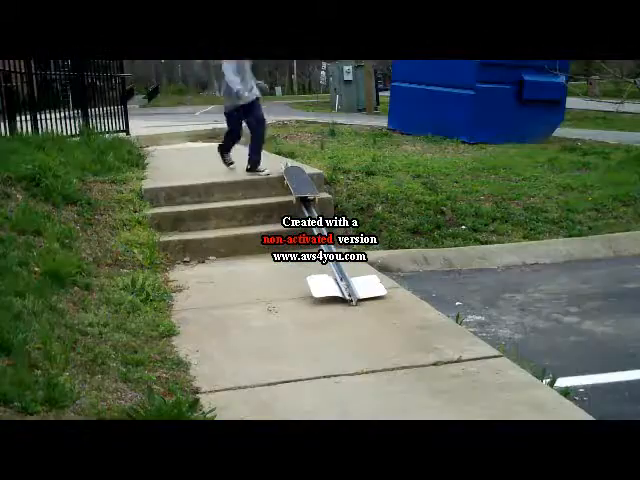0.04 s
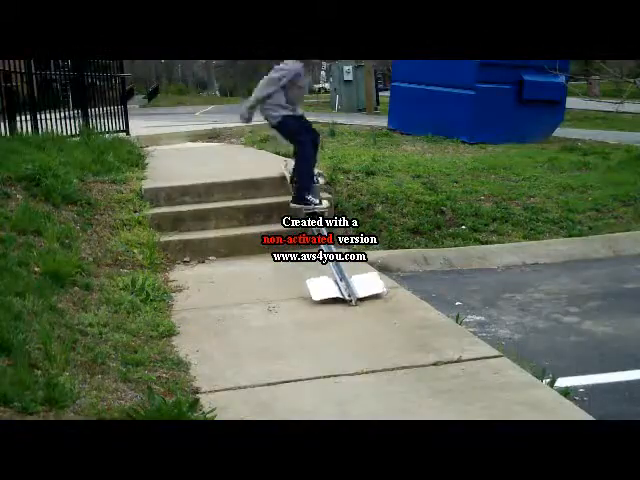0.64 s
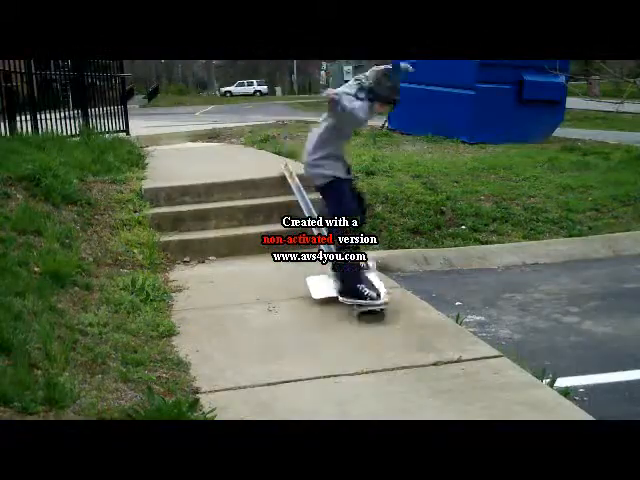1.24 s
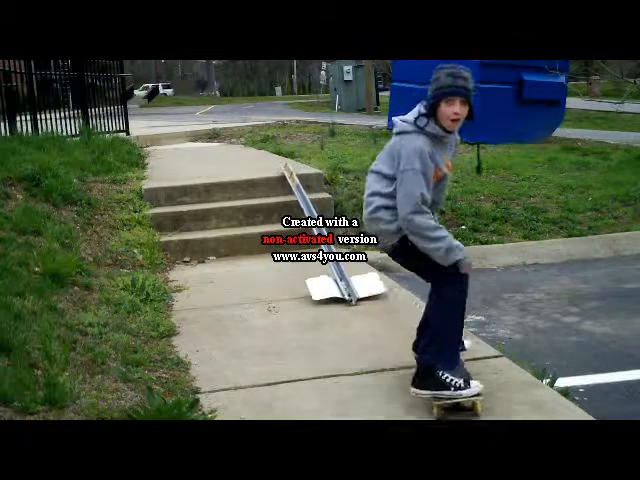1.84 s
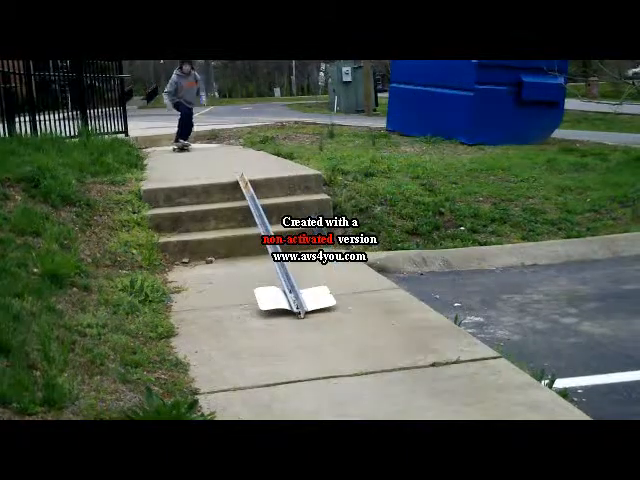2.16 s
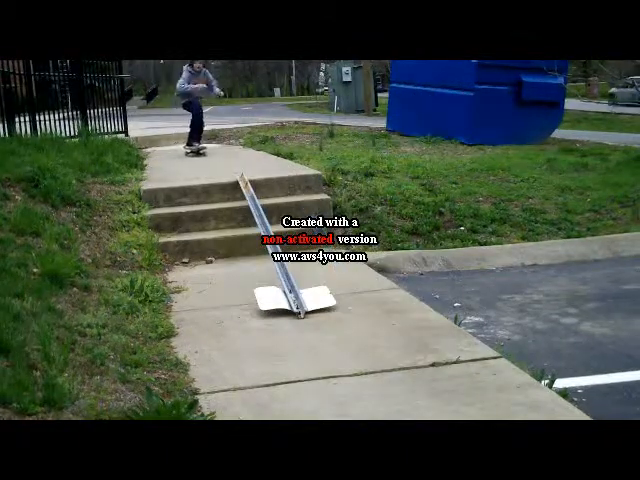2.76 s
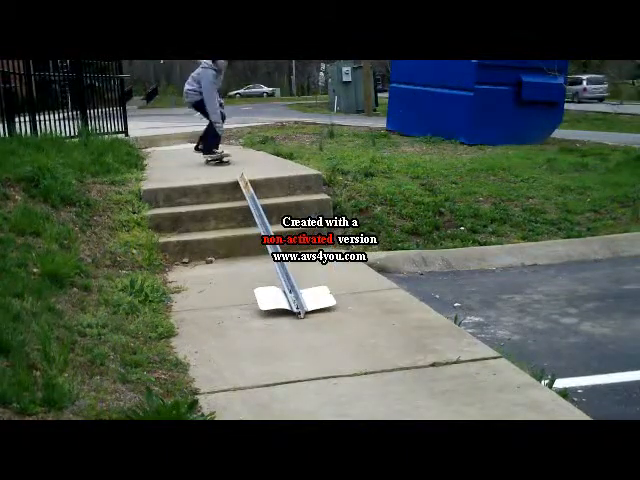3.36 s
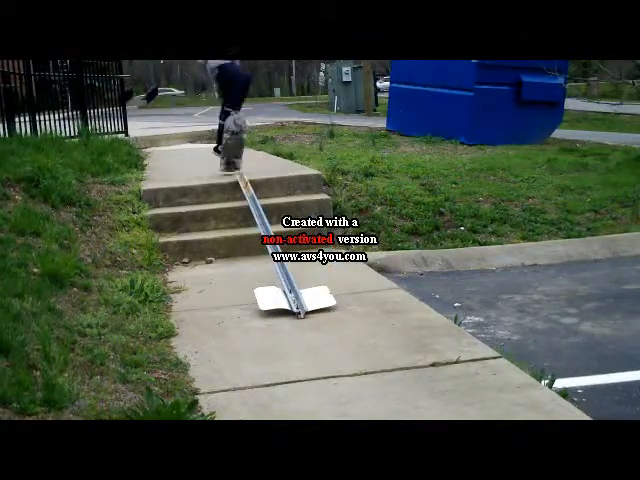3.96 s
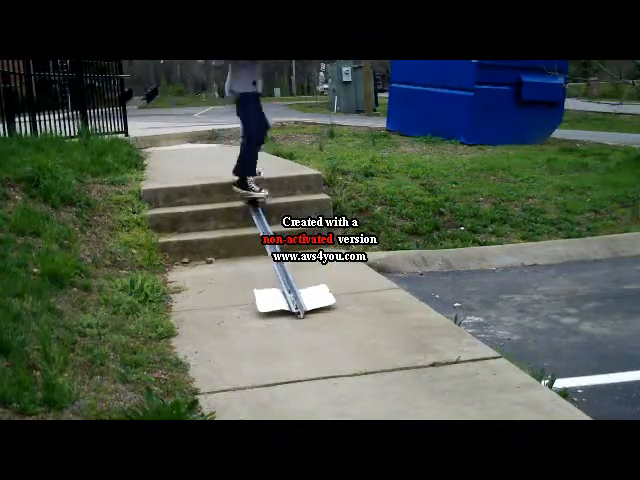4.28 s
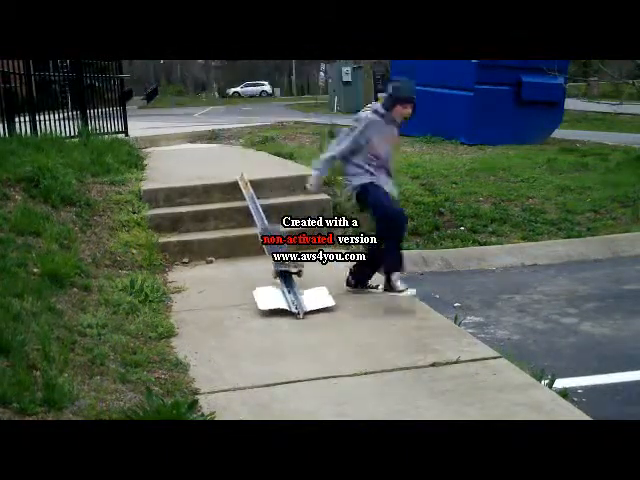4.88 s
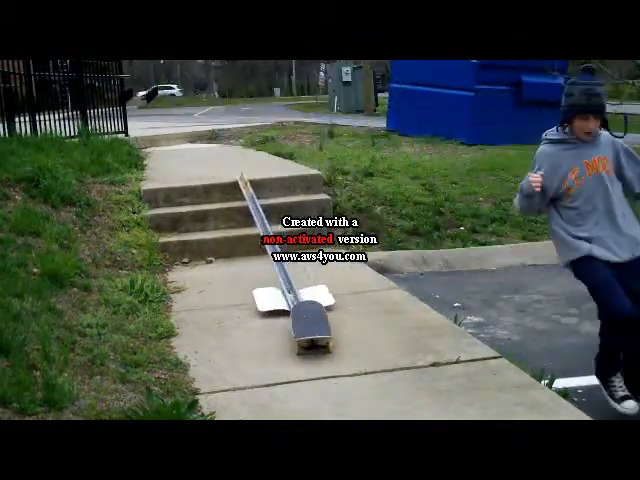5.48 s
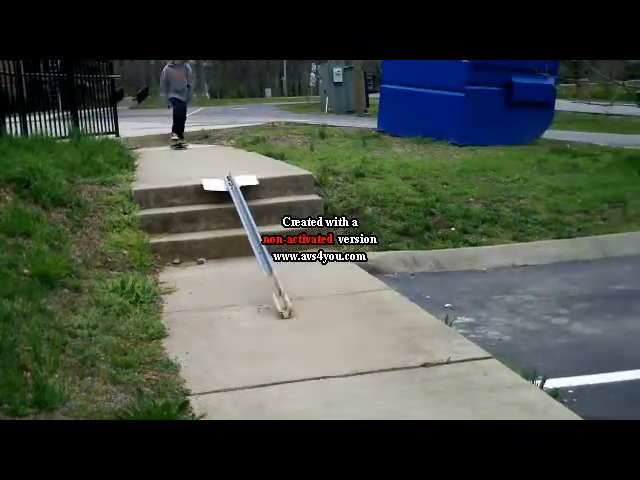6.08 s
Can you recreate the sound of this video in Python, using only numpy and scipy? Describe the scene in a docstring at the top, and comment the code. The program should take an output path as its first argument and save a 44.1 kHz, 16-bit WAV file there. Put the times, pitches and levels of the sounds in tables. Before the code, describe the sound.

Skateboard scraping along a ringing steel rail and rolling on concrete, followed by a second try with a sharp pop and rattling slide.

```python
"""A skateboard grinds down a steel rail, metal catching on metal and ringing the tube, then lands on
concrete and rolls on hard wheels. After an abrupt cut it rolls in from afar, knocking over pavement
joints, pops, slams onto the rail and clatters down it without its rider, wheels whirring and trucks
rattling, then rolls away. Light wind and distant traffic lie underneath."""
import sys
import numpy as np
from scipy import signal
from scipy.fft import rfft, irfft, next_fast_len
from scipy.io import wavfile

SR = 44100
rng = np.random.default_rng(int(sys.argv[2]) if len(sys.argv) > 2 else 0)


def inscribe(sig):
    """Save sig as 16-bit PCM at rate SR to the path in sys.argv[1].

    A 1-D sig is mono; a 2-D sig holds one channel per row.
    Samples are clipped to [-1, 1] before scaling.
    """
    pcm = np.round(np.clip(np.atleast_2d(sig).T, -1, 1) * 32767)
    wavfile.write(sys.argv[1], SR, pcm.astype(np.int16))


N = 269892
T = np.arange(N) / SR
CUT_S = 2.015   # the second ride takes over
SKID_START_S, SKID_END_S = 4.375, 5.5   # the riderless board is on the rail

# the truck bites into the rail as the rider's weight shifts: (time [s], scrape [dB], rasp pitch [Hz])
RIDER_PRESSURE = [(0.6, -30, 950), (0.623, -25, 950), (0.72, -24, 850), (0.781, -19, 950),
                  (0.83, -22, 1200), (0.892, -14, 1342), (1.0, -17.5, 1147), (1.14, -16.5, 1709),
                  (1.261, -17.5, 1558), (1.31, -21.5, 1500), (1.345, -16.5, 1650), (1.439, -15.5, 1750)]
# resonances of deck and trucks: (pitch [Hz], width [Hz], level [dB])
DECK_MODES = [(366, 42, 3), (780, 66, 3.5), (1130, 210, 6.5), (1580, 84, -3), (1920, 170, -13),
              (3010, 200, -2.5), (5030, 500, 1), (6550, 120, -4), (8870, 200, -10)]


def from_db(db):
    """Decibels to amplitude."""
    return 10 ** (np.asarray(db) / 20)


def rms_one(x):
    """Scales a sound to rms 1."""
    return x / np.sqrt(np.mean(x ** 2) + 1e-20)


def in_time(rows):
    """Turns rows of (time, values...) into one automation curve per value."""
    times, *columns = np.transpose(rows)
    return [np.interp(T, times, column) for column in columns]


def during(start, end, fade_in=0.013):
    """A gate, open from start to end, with short fades."""
    return np.clip((T - start) / fade_in + .5, 0, 1) * np.clip((end - T) / .006 + .5, 0, 1)


def swell(crest, half_length):
    """A bell-shaped rise and fall."""
    return np.exp(-np.minimum(((T - crest) / half_length) ** 2, 40))


def dying(t, t60):
    """An envelope that jumps to 1 at t = 0 and decays."""
    return (t >= 0) * from_db(-60 * np.clip(t / t60, 0, 3))


def butter(x, hz, kind, order=2):
    """A Butterworth filter."""
    return signal.sosfilt(signal.butter(order, hz, kind, fs=SR, output="sos"), x)


def resonance(x, hz, width_hz):
    """One ringing band-pass mode."""
    r = np.exp(-np.pi * width_hz / SR)
    feedback = [1, -2 * r * np.cos(2 * np.pi * hz / SR), r * r]
    return signal.lfilter(np.array([1, 0, -1]) * (1 - r * r) / 2, feedback, x + 1e-18)


def eq_curve(spectrum, size):
    """Gain per FFT bin through (Hz, dB) points."""
    hz, db = np.transpose(spectrum)
    return from_db(np.interp(np.log(np.fft.rfftfreq(size, 1 / SR) + 1), np.log(hz), db))


def coloured(x, spectrum):
    """Gives a steady sound a tone colour; rms 1."""
    size = next_fast_len(N)
    return rms_one(irfft(rfft(x, size) * eq_curve(spectrum, size), size)[:N])


def drift(rate_hz):
    """A smooth random wobble, mostly slower than rate_hz; rms about 1."""
    hop, run_in = 40, 2000
    r = np.exp(-2 * np.pi * rate_hz * hop / SR)
    noise = rng.standard_normal(N // hop + run_in + 2)
    slow = signal.lfilter([1], [1, -2 * r, r * r], noise)[run_in:]
    return np.interp(np.arange(N) / hop, np.arange(len(slow)), rms_one(slow))


def narrow_noise(hz, width_hz):
    """A band of noise around a moving pitch; rms about 1."""
    phase = 2 * np.pi * np.cumsum(hz) / SR
    return drift(width_hz) * np.cos(phase) + drift(width_hz) * np.sin(phase)


def grains(per_s, spread_db):
    """Tiny collisions of uneven size at random moments; rms 1."""
    sizes = from_db(spread_db * np.minimum(rng.exponential(1, N), 4)) * rng.choice([-1, 1], N)
    return rms_one(sizes * (rng.random(N) < per_s / SR))


def wind(gust_db=2.0):
    """Gusts buffet the microphone with a deep rumble."""
    # colour of the buffeting: (frequency [Hz], gain [dB])
    colour = [(10, -2), (18, 3.5), (30, -4.5), (42, -20.5), (100, -17.5)]
    # strength of the wind: (time [s], level [dB])
    strength = [(0, -37), (0.9, -31.5), (1.05, -30.5), (1.75, -29.5), (2.15, -41.5), (3.05, -37),
                (3.6, -39), (6.12, -44)]
    rumble = rms_one(butter(coloured(rng.standard_normal(N), colour), 85, "low"))
    return from_db(in_time(strength)[0] + gust_db * drift(1.5)) * rumble


def traffic(start_db=-45, growth_db_per_s=0.65, waver_db=0.9):
    """Distant engines drone, waver and slowly grow."""
    # colour of the engines: (frequency [Hz], gain [dB])
    colour = [(29, -37), (50, -4), (54, 7), (92, -1.5), (118, 0.5), (140, -5.5), (193, -15), (260, 6),
              (340, -47), (570, -120)]
    drone = rms_one(butter(coloured(rng.standard_normal(N), colour), [65, 160], "band"))
    return from_db(start_db + growth_db_per_s * T + waver_db * drift(4.4)) * drone


def open_air(air_db=-44):
    """A steady bed of outdoor noise with thin whines in its hiss."""
    # colour of the air: (frequency [Hz], gain [dB])
    colour = [(35, -43), (60, 6.5), (108, -1.5), (149, -12), (189, -12), (330, -20), (882, -18),
              (968, -16.5), (4970, -40.5), (6000, -37), (7060, -47), (7570, -39), (9790, -44), (14900, -48),
              (16000, -66)]
    # faint high whines: (pitch [Hz], width [Hz], level [dB])
    whines = [(6020, 91, -66), (8050, 300, -73), (8940, 180, -65.5), (15050, 80, -85)]
    air = from_db(air_db) * rms_one(butter(coloured(rng.standard_normal(N), colour), 160, "high"))
    hiss = rng.standard_normal(N)
    return air + sum(from_db(db) * rms_one(resonance(hiss, hz, width)) for hz, width, db in whines)


def sliding_power(ridden_hiss_db=-4.5, skid_db=-25.5, scrape_fade_db_per_s=0.5, hiss_fade_db_per_s=13.5):
    """Power of scrape and hiss: pressed by the rider, then dulling as the loose board loses speed."""
    pressure = from_db(in_time(RIDER_PRESSURE)[0])
    ridden = during(RIDER_PRESSURE[0][0], RIDER_PRESSURE[-1][0]) * pressure
    loose = during(SKID_START_S, SKID_END_S)
    age = np.maximum(T - SKID_START_S, 0)
    scrape = ridden + loose * from_db(skid_db - scrape_fade_db_per_s * age)
    hiss = ridden * from_db(ridden_hiss_db) + loose * from_db(skid_db - hiss_fade_db_per_s * age)
    return scrape ** 2, hiss ** 2


def grind(clank_db=2.5, judder_db=-1.0, patchy_db=1.5, split_hz=3200, zing_db=-11.5):
    """Metal catches on metal thousands of times a second; each bang presses harder for a moment."""
    # colour of the friction: (frequency [Hz], gain [dB])
    colour = [(88, -66), (150, -19), (303, -12), (354, -11), (391, -9), (624, -5), (759, -3), (1600, 1),
              (3490, -9.5), (5570, -8), (7770, -15.5), (9820, -15.5), (12200, -20), (15100, -32),
              (16000, -64)]
    # the board bangs on the rail: (time [s], relative level [dB], half of t60 [s], relative treble [dB])
    clanks = [(0.582, -32, 0.06, -1), (0.613, -16, 0.044, 8), (0.618, -16.5, 0.035, 5),
              (0.768, -19.5, 0.09, 2), (1.047, -17, 0.2, 0), (1.405, -17, 0.014, -6),
              (1.437, -28, 0.088, 9.5), (4.374, -17.5, 0.091, 5), (4.387, -13.5, 0.089, 8.5),
              (4.406, -18, 0.09, 14.5), (4.44, -16.5, 0.068, 11.5), (4.486, -21.5, 0.21, -18),
              (4.522, -21, 0.12, -9), (4.576, -19.5, 0.23, 0), (4.763, -16, 0.15, -2.5),
              (4.871, -21.5, 0.087, 4), (4.9576, -15, 0.18, 7.5), (5.085, -24, 0.018, 11),
              (5.13, -21.5, 0.29, 1), (5.174, -19, .07, -8), (5.222, -25, 0.17, 0), (5.283, -17, 0.15, -8),
              (5.353, -18.5, 0.12, 0), (5.422, -20, 0.093, -4), (5.484, -19.5, 0.2, -1)]
    friction = np.zeros(N)
    edges_hz = np.geomspace(100, 16000, 15)
    contacts = [grains(per_s=6000, spread_db=2.0) for _ in range(2)]
    for k in range(len(edges_hz) - 1):   # the wandering contact point favours now one band, now another
        friction += butter(contacts[k % 2], edges_hz[k:k + 2], "band") * from_db(patchy_db * drift(9.6))
    friction = coloured(friction, colour) * from_db(judder_db * drift(92))
    scrape = rms_one(butter(friction, split_hz, "low", order=4))
    hiss = rms_one(butter(friction, split_hz, "high", order=4))
    zing = rms_one(butter(hiss, 9000, "high", order=1))   # the bright edge of a bang
    scrape_power, hiss_power = sliding_power()
    zing_power = np.zeros(N)
    for s, db, half_t60, treble_db in clanks:
        start = int(s * SR)
        t = T[:N - start]
        bite = 1 - np.exp(-t / (0.02 * half_t60))   # a long scrape takes a moment to bite
        power = (from_db(db + clank_db) * bite * dying(t, 2 * half_t60)) ** 2
        scrape_power[start:] += power
        zing_power[start:] += power * from_db(treble_db + zing_db) ** 2
    force = scrape * np.sqrt(scrape_power) + hiss * np.sqrt(hiss_power) + zing * np.sqrt(zing_power)
    return rail(force) + rattle(scrape_power)


def rail(force, body_db=-1.5, ring_db=1.5, wash_db=-16.0, wash_t60=0.91):
    """The steel tube answers at once, rings in its strong modes and leaves a wash of many weak ones."""
    # ringing of the rail: (pitch [Hz], relative level [dB], t60 [s])
    modes = [(360, -2, .3), (495, -3, .3), (570, -3, .3), (636, 1, .4), (710, -3, .25), (915, -5, .15),
             (1001, -3, .4), (1282, -5, .25), (1451, -6, .25), (1631, -3, .25), (1797, -6, .25),
             (2256, -7, .25), (2860, -6, .2), (3213, -6, .4), (3648, -7, .2), (3842, -2, .2),
             (4317, -5, .15), (4413, -4, .3), (4570, -6, .2), (4705, -5, .2), (5135, -5, .1),
             (5245, -6, .12), (5617, -5, .15), (5672, -4, .15), (6056, -4, .25), (6697, -4, .25),
             (6975, -5, .2), (7365, 0, .25)]
    ring = sum(from_db(db) * resonance(force, hz, np.log(1000) / (np.pi * t60)) for hz, db, t60 in modes)
    t = T[:SR // 2]
    weak_modes = butter(rng.standard_normal(len(t)), [400, 6000], "band") * dying(t, wash_t60)
    wash = signal.fftconvolve(force, weak_modes / np.linalg.norm(weak_modes))[:N]
    return from_db(body_db) * (force + from_db(ring_db) * ring) + from_db(wash_db) * wash


def rasp(rasp_db=-3.5, width_hz=184.0, groan_wobble_hz=48):
    """Stick and slip favour one rough pitch, louder under more weight, and pump the rail's low modes."""
    # a low mode swells for a moment: (crest [s], pitch [Hz], level [dB], half length [s])
    groans = [(0.99, 672, -24.5, 0.025), (1.044, 560, -27, .025), (1.185, 621, -19, 0.022),
              (1.334, 677, -22.5, 0.046), (1.484, 622.6, -29.5, 0.066)]
    scrape_db, rasp_hz = in_time(RIDER_PRESSURE)
    on_rail = during(RIDER_PRESSURE[0][0], RIDER_PRESSURE[-1][0])
    out = on_rail * from_db(scrape_db + rasp_db) * narrow_noise(rasp_hz, width_hz)
    for crest, hz, db, half_length in groans:
        phase = 2 * np.pi * np.cumsum(hz + groan_wobble_hz * drift(65.6)) / SR
        out += from_db(db) * swell(crest, half_length) * np.sqrt(2) * np.sin(phase)
    return out


def knocks(width_share=0.38, thump_hz=280, tail_db=-37.0, tail_t60=0.29, sharp_s=0.0095, deck_db=-6.0):
    """A blow and its chatter sound a broad wooden resonance, with a crack above and a thump below."""
    # the board knocks on concrete, joints and rail, with a shoe scuff after the pop:
    # (time [s], level [dB], pitch [Hz], chatter t60 [s], relative crack [dB], relative thump [dB])
    blows = [(1.4362, -2, 1280, 0.02, -10, -15.5), (1.4405, -6, 616, 0.0084, -27, -12),
             (1.5858, -21, 2280, 0.012, 1.5, -1), (1.713, -8.5, 1850, 0.0047, -0.5, -24),
             (1.717, -14, 1680, 0.065, -15, -9), (1.813, -18, 1870, 0.014, -22, -9),
             (1.882, -9.5, 1400, 0.046, -14, -12), (2.312, -36, 7060, 0.0087, 5.5, 6),
             (2.805, -25.5, 1730, 0.025, -10, -18), (2.821, -27.5, 1990, 0.09, -6, -4.5),
             (2.863, -24.5, 1700, 0.012, -5, -7), (2.979, -13.5, 1310, 0.033, -14.5, -9.5),
             (2.986, -20, 770, 0.05, -15, -12), (3.214, -39, 2200, .03, 5, -9),
             (3.327, -34.5, 1720, 0.2, -11, -21), (3.457, -24, 1480, 0.084, -4, -2.5),
             (3.605, -25, 1530, 0.016, -2, -4), (3.613, -14, 1330, 0.03, -12, -9),
             (3.618, -19, 650, 0.03, -20, -16), (3.917, -34, 1670, 0.18, -4.5, -12),
             (4.0623, 0.5, 2060, 0.012, -31, -26), (4.0648, -0.5, 1310, 0.0066, -22, -16),
             (4.069, -17, 2160, 0.037, -12, -15), (4.084, -31.5, 1390, 0.31, -15, -27),
             (4.242, -29.5, 1380, 0.039, -26, -20), (4.303, -34.5, 1470, 0.031, -24, -21),
             (4.3703, -19.5, 340, 0.074, -24, -3), (4.375, -11.5, 820, 0.039, -11, -8),
             (4.39, -14, 354, 0.038, -2, -5), (4.406, -17, 337, 0.026, -7, -10),
             (4.4418, -13, 1600, 0.01, -11, -12), (4.525, -18, 910, 0.11, -14, -4.5),
             (4.825, -20, 7400, 0.024, -10, -23), (5.106, -5, 3100, 0.01, -30, -10.5),
             (5.287, -11.5, 1176, 0.039, -23, -24), (5.351, -19, 1700, 0.011, -5, -17),
             (5.361, -13.5, 1500, 0.021, -10, -13), (5.507, -10.5, 1860, 0.028, -10, -9),
             (5.5109, 4, 690, 0.0049, -11, -22), (5.566, -11, 1450, 0.068, -15, -17),
             (5.639, -27, 1870, 0.056, -4, -1), (5.707, -26, 1860, 0.052, -9, -6),
             (5.862, -18.5, 1460, 0.062, -6.5, -6.5), (5.927, -29, 1860, 0.092, -5, -12),
             (6.112, -11, 1550, 0.032, -14, -13)]
    out, t = np.zeros(N + SR), T[:SR // 4]
    for s, db, hz, t60, crack_db, thump_db in blows:
        envelope = dying(t, t60) + from_db(tail_db) * min(t60 / 0.12, 1) * dying(t, tail_t60)
        chatter = rng.standard_normal((3, len(t))) * envelope
        # in wood and thump, a short knock is one clean blow
        chatter[::2, 0] += np.linalg.norm(envelope) * (sharp_s / t60) ** 2
        wood = resonance(resonance(chatter[0], hz, width_share * hz), hz, 2 * hz)
        crack = butter(butter(chatter[1], 2500, "high"), 7000, "low", order=1)
        thump = butter(resonance(chatter[2], thump_hz, width_hz=220), 1600, "low")
        hit = rms_one(wood) + from_db(crack_db) * rms_one(crack) + from_db(thump_db) * rms_one(thump)
        contact = min(t60 / 0.097, 1)   # longer contacts ring the whole deck
        hit += from_db(deck_db) * contact * rms_one(deck_ring(chatter[0]))
        start = int(s * SR)
        out[start:start + len(t)] += from_db(db) * hit * np.sqrt(np.mean(envelope ** 2))
    return out[:N]


def deck_ring(force):
    """Deck and trucks resonate when shaken."""
    return sum(from_db(db) * resonance(force, hz, width) for hz, width, db in DECK_MODES)


def thuds(band_hz=(65, 150), t60=0.28):
    """The rider's weight lands on ground or rail with a short burst of bass."""
    # landings: (time [s], level [dB])
    landings = [(1.44, -31), (1.71, -28.5), (4.09, -30.5), (4.381, -27), (4.54, -35), (4.881, -30),
                (5.105, -32)]
    envelope = sum(from_db(db) * dying(T - s, t60) for s, db in landings)
    bass = rms_one(butter(rng.standard_normal(N), band_hz, "band"))
    return butter(envelope * bass, 300, "low")


def rolling(bumps_db=2.0, broad_db=-4.5, pebble_db=-10, hum_db=-1.0, drum_db=-4):
    """Hard wheels drum over sand and pebbles, shake the deck and hum at a new pitch in each run."""
    # runs on concrete, levels at mid-run: (start [s], end [s], fade-in [s], hum pitch [Hz], roar [dB],
    # rumble [dB], grit [dB], roar growth [dB/s], rumble growth [dB/s], grit growth [dB/s])
    runs = [(1.452, 2.015, .01, 445, -28.5, -34.5, -39.5, 1, 19, 3),
            (2.573, 4.068, 0.15, 316, -43.5, -45, -49, -2, 6.5, 2.5),
            (5.508, 6.125, .01, 427, -29.5, -44.5, -40.5, 3, -11, -1)]
    # rougher pavement: (middle [s], half length [s], extra roar [dB], extra grit [dB])
    rough_patches = [(1.69, 0.11, 3, 6.5), (2.74, 0.13, 0.5, 6), (3.183, 0.065, 3, 1.5),
                     (3.42, 0.16, 5.5, 4.5), (3.84, 0.052, 4, 2), (4.032, 0.028, 13.5, 5.5),
                     (5.93, 0.041, 3.5, 4.5)]
    # colour of the rolling board: (frequency [Hz], gain [dB])
    colour = [(71, -32), (120, 10.5), (188, 4), (454, 1.5), (513, 1.5), (630, -9.5), (822, -4), (1070, -9),
              (1900, -0.5), (3520, -17.5), (5080, -17), (7350, -18), (10800, -17.5), (14700, -24),
              (16000, -48)]
    road = grains(per_s=4000, spread_db=2.5) * from_db(bumps_db * drift(33))
    deck = coloured(from_db(broad_db) * road + deck_ring(road), colour)
    pebbles = rms_one(butter(grains(per_s=300, spread_db=3.0), [2500, 11000], "band"))
    roar = rms_one(butter(deck, [560, 3700], "band", order=4))
    drumming = from_db(drum_db) * rms_one(butter(road, [115, 260], "band"))
    grit = rms_one(butter(deck, 2490, "high", order=4)) + from_db(pebble_db) * pebbles
    for middle, half_length, roar_db, grit_db in rough_patches:
        roar *= from_db(roar_db * swell(middle, half_length))
        grit *= from_db(grit_db * swell(middle, half_length))
    out = np.zeros(N)
    for start, end, fade_in, hum_hz, *levels in runs:
        roar_db, rumble_db, grit_db, roar_growth, rumble_growth, grit_growth = levels
        t = np.clip(T, start, end) - (start + end) / 2
        rumble = drumming + from_db(hum_db) * rms_one(resonance(road, hum_hz, width_hz=110))
        out += during(start, end, fade_in) * (roar * from_db(roar_db + roar_growth * t)
                                              + rumble * from_db(rumble_db + rumble_growth * t)
                                              + grit * from_db(grit_db + grit_growth * t))
    return out


def street(level_db=-45.5):
    """A steady wash of street noise."""
    # colour of the street: (frequency [Hz], gain [dB])
    colour = [(100, -21), (170, 0), (322, -9), (395, -5), (486, -12.5), (902, -6), (1170, -23),
              (1580, -9.5), (2990, -23), (15000, -35.5)]
    return from_db(level_db) * coloured(rng.standard_normal(N), colour)


def whirr(width_share=0.12):
    """Bands of bearing noise swell, fade and sink as a freely spinning wheel slows."""
    # spins: (crest [s], pitch at crest [Hz], slowing [octaves/s], level [dB], half length [s])
    spins = [(4.192, 2360, 1.0, -41, 0.18), (4.729, 1220, 2.0, -25.5, 0.061), (5.819, 881, .9, -27.5, 0.17)]
    # bands of the bearing: (multiple of the pitch [ratio], relative level [dB])
    bands = [(.33, -19.5), (.47, -16), (0.619, -16), (1, -2), (1.38, -30)]
    out = np.zeros(N)
    for crest, hz, slowing, db, half_length in spins:
        pitch = hz * 2 ** (-slowing * np.clip(T - crest, -.5, .5))
        for multiple, band_db in bands:
            band = narrow_noise(multiple * pitch, width_share * multiple * hz)
            out += swell(crest, half_length) * from_db(db + band_db) * band
    return out


def rattle(scrape_power, relative_db=-8.5):
    """With no rider to damp them, trucks and bolts ring from small hits, as hard as the board scrapes."""
    # ringing of the hardware: (pitch [Hz], relative level [dB], t60 [s])
    modes = [(1730, -7, 0.051), (1977, 1, .06), (2100, -2, 0.041), (2170, -9, 0.056), (2530, -13, .05),
             (3780, -8, 0.083), (5669, -8, 0.09), (6180, -9, 0.056), (9300, -26, .06)]
    hits = grains(per_s=160, spread_db=-0.5) * np.sqrt(scrape_power) * (T > SKID_START_S)
    t = T[:SR // 4]
    ring = sum(from_db(db) * dying(t, t60) * np.sin(2 * np.pi * hz * t) for hz, db, t60 in modes)
    return from_db(relative_db) * signal.fftconvolve(hits, ring / np.linalg.norm(ring))[:N]


def outdoors(x, tail_db=-12.5, tail_t60=0.057, dull_hz=3500):
    """Steps and walls add a few dull echoes and a thin tail."""
    # reflections: (delay [s], level [dB])
    echoes = [(.0085, -34),  (.024, -20), (0.064, -35)]
    t = T[:SR // 2]
    tail = rng.standard_normal(len(t)) * dying(t, tail_t60)
    response = from_db(tail_db) * tail / np.linalg.norm(tail)
    for delay, db in echoes:
        response[int(delay * SR)] += from_db(db)
    return x + signal.fftconvolve(x, butter(response, dull_hz, "low"))[:N]


def scene():
    """The first ride and its echoes stop dead at the cut; the second has more street under it."""
    board = grind() + rasp() + rolling() + whirr() + knocks() + thuds()
    first, second = T < CUT_S, T >= CUT_S
    street_bed = street() * second
    rides = outdoors(board * first) * first + outdoors(board * second)
    mono = rides + street_bed + wind() + traffic() + open_air()
    return np.array([mono, mono])


def record(dry, cutoff_hz=15400):
    """Spreads the sound into narrow stereo, soft-clips the hardest knocks and cuts the top."""
    # stereo width: (frequency [Hz], side relative to mid [dB])
    width = [(40, -9.5), (150, -37), (400, -34.5), (1000, -65), (2000, -62), (4000, -52), (10000, -32.5)]
    scatter = rfft(rng.standard_normal(64), N)
    phase_turn = 1j * scatter / np.abs(scatter)
    side = irfft(rfft(dry[0]) * eq_curve(width, N) * phase_turn, N)
    stereo = dry + np.array([side, -side])
    clipped = stereo / (1 + stereo ** 6) ** (1 / 6)
    return signal.sosfilt(signal.ellip(10, .1, 80, cutoff_hz, fs=SR, output="sos"), clipped)


dry = scene()
out = record(dry)
inscribe(out)
```